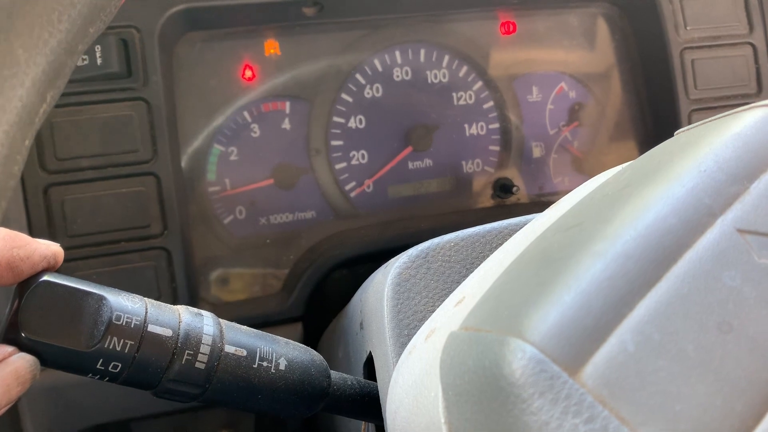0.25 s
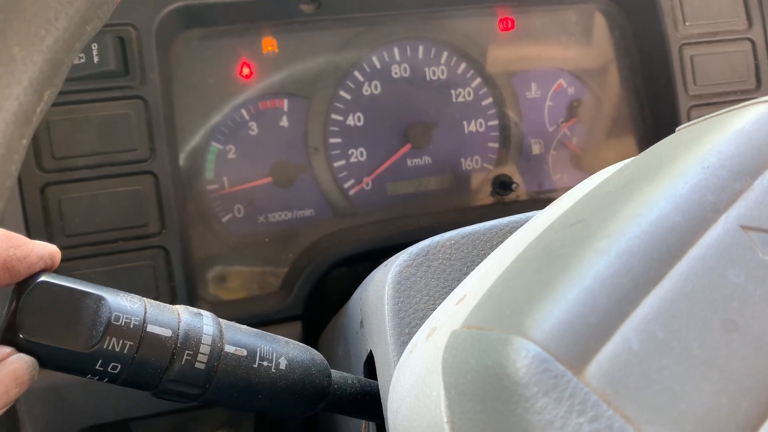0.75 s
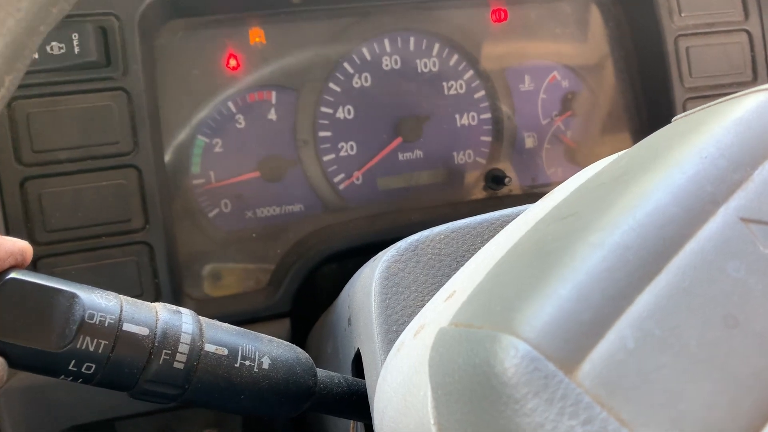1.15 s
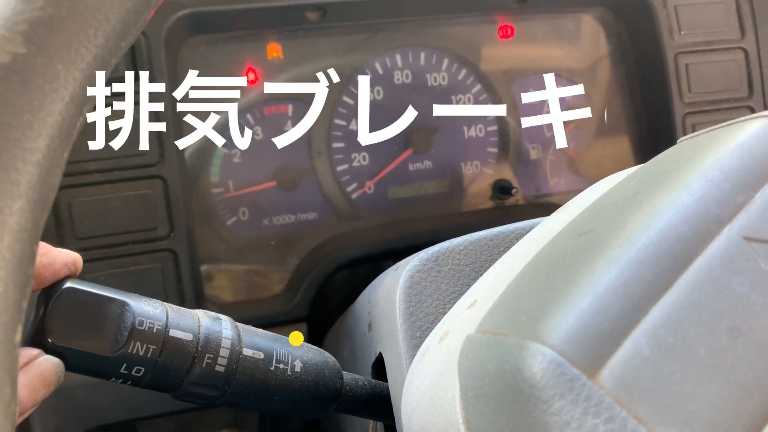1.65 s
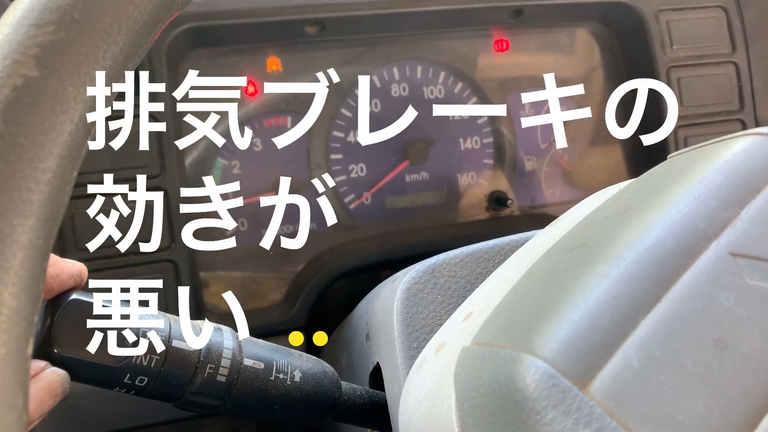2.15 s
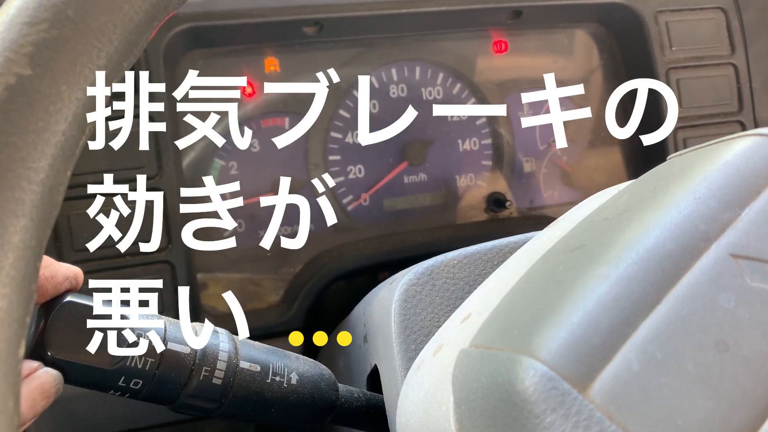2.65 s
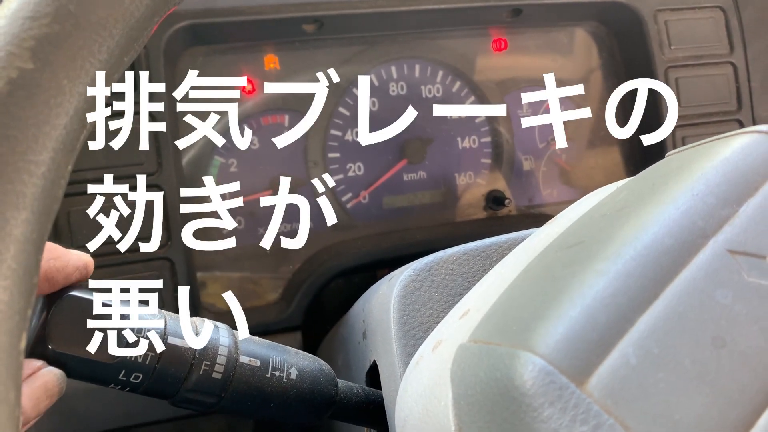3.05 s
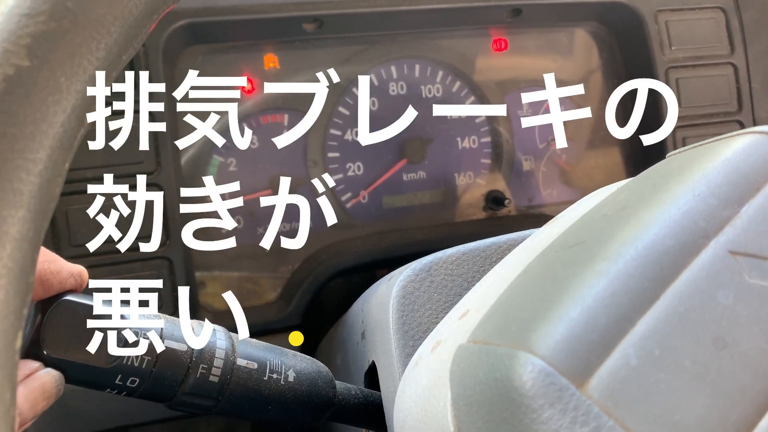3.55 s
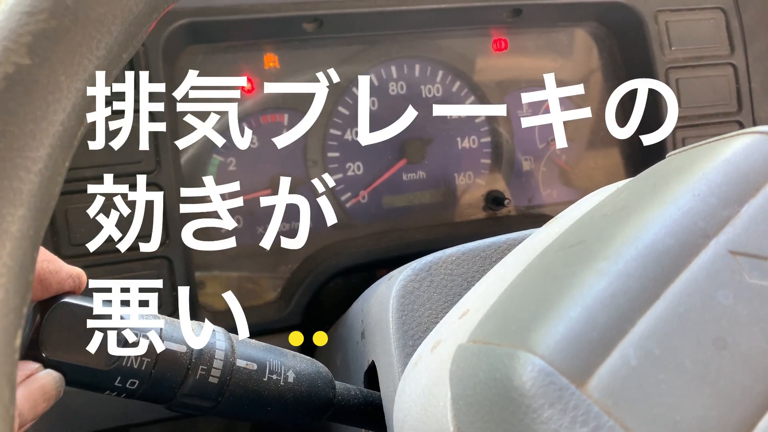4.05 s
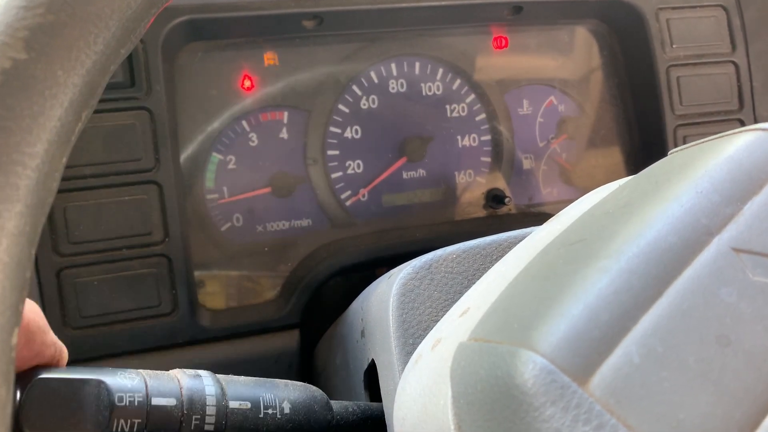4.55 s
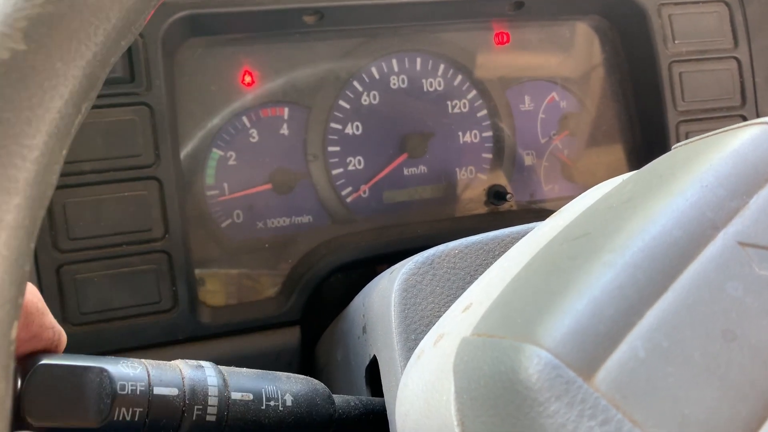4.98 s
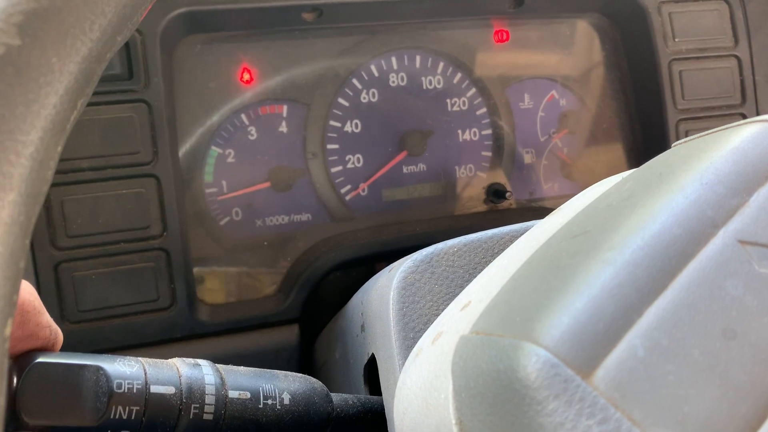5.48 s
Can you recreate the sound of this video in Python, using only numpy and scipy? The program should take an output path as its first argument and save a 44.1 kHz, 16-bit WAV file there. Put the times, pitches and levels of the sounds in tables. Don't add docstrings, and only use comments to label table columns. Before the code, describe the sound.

From 0 to about 4.5 seconds a four-cylinder diesel idles under a parked truck cab with its exhaust brake shut: a loud, steady drone around 55 Hz, pulsing about 27 times a second, with block knock, clattering valves and injectors, buzzing panels, uneven floor rumble, a faint fan and pump whine and a thin, fluttering air hiss. At 3.58 a short dry switch tick sounds. At about 4.55 a valve opens with a tick and a bright, sharp puff of air, which quickly drops to a weaker hiss and bleeds out by about 4.9. The drone falls away from 4.6, the engine slowing to about 24 pulses a second by 5.0, while the cab booms low and wavering, then settles. Very high, faint belt squeaks come at 4.85, 5.16 and 5.38. A softer, slightly lower clattering idle runs to the end at 5.7. Close, dry stereo phone pickup.

```python
import sys
import numpy as np
from scipy import signal
from scipy.fft import rfft, irfft
from scipy.io import wavfile
from scipy.ndimage import uniform_filter1d

SR = 44100
rng = np.random.default_rng(int(sys.argv[2]) if len(sys.argv) > 2 else 0)


def volts_from_decibels(level):
    exponent = np.asarray(level, float) / 20
    return 10 ** exponent


def materialize(psi):
    bounded = np.clip(np.atleast_2d(psi).T, -1, 1)
    quanta = np.round(bounded * 32767).astype(np.int16)
    wavfile.write(sys.argv[1], SR, quanta)


N = 252252
T = np.arange(N) / SR

# (time [s], rate [firings per s])
SPEED = [
    (0, 27.52),
    (4.56, 27.52),
    (4.72, 26.5),
    (4.98, 24.2),
    (5.2, 23.75),
    (5.72, 23.45),
]
# (pitch [Hz], lead [radians])
LEAD = [(28, -.6), (65, .55), (270, 3.1), (390, 5.1), (2300, 4.2), (5300, 9.4), (6250, 12.57), (15800, 0)]
# (pitch [Hz], likeness [0-1], left minus right [dB])
PORTS = [(40, 0.8, -2), (424, 0.93, 0.75), (610, 0.27, 0), (940, 0.35, -5.5), (1500, 0.78, -0.5),
         (2600, 0.18, -1.3), (6240, 0.32, -3.4), (7760, 0.93, 0)]

FIRING_HZ = np.interp(T, *np.transpose(SPEED))
CYCLES = np.cumsum(FIRING_HZ) / SR / 4
VALVE_S = 4.546
OPEN_S = 4.61


def ramp(t, start, length):
    return np.clip((t - start) / length, 0, 1)


def shut(t):
    swing_s = 0.024
    return 1 - ramp(t, OPEN_S, swing_s)


def fuel_db(t):
    warm_db, creep_db_per_s = 0.03, 0.04
    cut_db, cut_tau_s = -12, 0.15
    catch_s, catch_rise_s = 4.95, 0.11
    cut = cut_db * (1 - np.exp(-np.maximum(t - OPEN_S, 0) / cut_tau_s))
    return (warm_db + creep_db_per_s * t + cut) * (1 - ramp(t, catch_s, catch_rise_s))


def read(points, hz, column=1):
    rows = np.transpose(points)
    return np.interp(np.log(hz + 1), np.log(rows[0] + 1), rows[column])


def curve(points, column=1, t=T):
    rows = np.transpose(points)
    return np.interp(t, rows[0], rows[column])


def lift(modes, hz, column=2):
    return sum(m[column] / (1 + (2 * (hz - m[0]) / m[1]) ** 2) for m in modes)


def wander(rate_hz, t=T):
    hz = np.geomspace(rate_hz / 20, rate_hz, 12)[:, None]
    waves = np.sin(2 * np.pi * (hz * T[::256] + rng.random(hz.shape)))
    slow = (waves / np.sqrt(hz)).sum(0)
    return np.interp(t, T[::256], slow / slow.std())


def ports(x):
    half = np.exp(0.5j * curve(LEAD, t=np.fft.rfftfreq(N, 1 / SR)))
    return irfft(rfft(x) * np.array([half, 1 / half]), N)


def noise(braked_db, free_db, patchy_db, size=2048):
    linger_s = 0.055
    hop = size // 4
    frames, hz = N // hop + 5, np.fft.rfftfreq(size, 1 / SR)
    a, b, c, d, patch = rng.standard_normal((frames, len(hz), 5)).T
    patch = uniform_filter1d(uniform_filter1d(patch, size=8, axis=0), size=8, axis=1)

    flap = shut(np.arange(frames) * hop / SR - linger_s)
    db = braked_db(hz)[:, None] * flap + free_db(hz)[:, None] * (1 - flap)
    db = db + patchy_db * patch / patch.std()

    same = np.clip(read(PORTS, hz), 0, 1)[:, None]
    tilt = volts_from_decibels(read(PORTS, hz, column=2) / 2)[:, None]
    lead = np.exp(1j * curve(LEAD, t=hz))[:, None]
    right = a + 1j * b
    left = same * right * lead + np.sqrt(1 - same ** 2) * (c + 1j * d)
    z = np.array([left * tilt, right / tilt]) * volts_from_decibels(db) * np.sqrt(3 * SR / size / 2)
    return signal.istft(z, nperseg=size, noverlap=size - hop)[1][:, :N]


def order(k, braked_db, free_db, lag, waver_db, pan_db=0.44, skew=0):
    t = T[::64]
    db = shut(t) * braked_db + (1 - shut(t)) * free_db + fuel_db(t)
    gain = np.sqrt(2) * np.interp(T, t, volts_from_decibels(db + waver_db * wander(6.0, t=t)))
    side = np.array([[0.5], [-0.5]])
    lead = curve(LEAD, t=k * FIRING_HZ / 4) + skew
    return gain * volts_from_decibels(side * pan_db) * np.cos(2 * np.pi * (k * CYCLES - lag) + side * lead)


def drone():
    # (order [waves per cycle], level braked [dB], level free [dB])
    firing_orders = [(4, -37, -48), (8, -21, -31), (12, -35, -35), (16, -40, -49), (20, -45, -46),
                     (24, -46, -48), (28, -46, -47), (32, -43, -45), (36, -54, -60)]
    # (order [waves per cycle], level braked [dB], level free [dB])
    uneven_db = [(5, -63, -68), (6, -52, -68), (7, -42, -50), (11, -49, -51), (13, -59, -60),
                 (19, -56, -59), (22, -55, -55), (30, -51, -57), (33, -52, -52), (35, -61, -61)]
    # (order [waves per cycle], level braked [dB])
    geared = [
        (6.65, -48),
        (7.33, -48),
        (10.28, -46),
    ]
    scatter_db = 1.5
    timing_below = 12

    firing = sum(order(k, a, b, 0.33 * (k in (4, 12)), 0.35) for k, a, b in firing_orders)

    uneven = 0
    between = [k for k in range(5, 36) if k % 4]
    scatter = scatter_db * rng.standard_normal((len(between), 2))
    for k, (a, b) in zip(between, scatter):
        braked_db = curve(uneven_db, t=k) + a
        free_db = curve(uneven_db, column=2, t=k) + b
        lag = np.where(k < timing_below, 0.17, rng.random())
        uneven = uneven + order(k, braked_db, free_db, lag, 2.0)

    whine = sum(order(k, db, db - 17.5, rng.random(), 3.2) for k, db in geared)
    return firing + uneven + whine


def knock():
    # (pitch [Hz], level [dB])
    outline = [(230, -50.5), (400, -59.5), (900, -68)]
    # (pitch [Hz], width [Hz], lift [dB])
    block = [(264, 32, 2.3), (346, 76, 7.8), (441, 35, 10.7), (570, 172, 8.65), (716, 11, 9.6),
             (874, 70, 10.2)]
    free_knock_db, uneven_firing_db = -5, 2.0
    pan, spread_rad = 1.8, 2.4

    def colour_db(hz):
        return read(outline, hz) + lift(block, hz)

    out = 0
    for n in range(10, 34):
        braked_hz, free_hz = n * FIRING_HZ[[0, -N // 20]]
        lag = 0.5 + 0.21 * rng.standard_normal()
        skew = spread_rad * (1 - read(PORTS, braked_hz)) * rng.standard_normal()
        pan_db = pan * read(PORTS, braked_hz, column=2)
        free_db = colour_db(free_hz) + free_knock_db
        out = out + order(4 * n, colour_db(braked_hz), free_db, lag, 1.5, pan_db, skew)
    strength = rng.standard_normal(200)[(4 * CYCLES).astype(int)]
    return out * volts_from_decibels(uneven_firing_db * uniform_filter1d(strength, size=300))


def clatter():
    # (pitch [Hz], level braked [dB per Hz], level free [dB per Hz])
    clatter_db = [(268, -75, -82), (362, -65, -69), (433, -68.5, -71), (580, -72, -78), (756, -74.5, -77.5),
                  (920, -73.5, -76), (1100, -74.5, -76), (1890, -73.5, -75.5), (2270, -79.5, -80.5),
                  (2830, -80.5, -80.5), (4350, -84.5, -84.5), (6950, -101, -91.5), (12700, -99, -99),
                  (15500, -120, -120)]
    # (pitch [Hz], width [Hz], lift [dB])
    panel_modes = [(369, 21, 0.5), (439, 26, 6), (598, 42, 3), (875, 25, 5), (1015, 20, 1), (1135, 30, 5),
                   (1305, 40, 3), (1570, 45, 7), (1800, 82, 4)]
    waves = uniform_filter1d(rng.standard_normal(1025), size=2)

    def panels(hz):
        return lift(panel_modes, hz) + 1.9 * waves * (hz < 6000)

    def braked_db(hz):
        return read(clatter_db, hz) + panels(hz)

    def free_db(hz):
        return read(clatter_db, hz, column=2) + panels(hz)

    rattle = noise(braked_db, free_db, 1.3)
    firing = 4 * CYCLES + 0.08
    beat_db = 5 * np.exp(-(firing % 1) / 0.15) + 4 * np.exp(-((firing + 0.5) % 1) / 0.15)
    beat_db *= 1 + 0.18 * np.cos(np.pi * firing)
    body = signal.lfilter(*signal.butter(1, 2500, fs=SR), rattle)
    return rattle + body * (volts_from_decibels(beat_db - beat_db.mean()) - 1)


def rumble():
    # (pitch [Hz], level braked [dB per Hz], level free [dB per Hz])
    rumble_db = [(20, -76, -79), (34.8, -66, -64), (50.3, -64, -58), (68, -55, -55), (88, -64, -66),
                 (137, -62, -57.5), (195, -58, -61), (231, -74, -71), (297, -74, -76), (400, -87, -111)]
    return noise(lambda hz: read(rumble_db, hz), lambda hz: read(rumble_db, hz, column=2), 0.64, size=4096)


def air():
    # (pitch [Hz], width [Hz], lift in leak [dB], lift in puff [dB])
    orifice = [(3400, 450, 4, -6), (4720, 430, 7, 7), (7900, 200, 7.5, 12.5)]
    # (pitch [Hz], level [dB per Hz])
    leak_colour = [(1500, -100), (3000, -97.5), (5000, -90), (7000, -88), (8700, -80), (10000, -89),
                   (13000, -86.5), (15800, -86.5)]
    # (pitch [Hz], level [dB per Hz])
    puff_colour = [(1000, -80), (2000, -79), (4500, -77), (6500, -76), (8800, -67), (12000, -78.5),
                   (15800, -86)]
    puff_rise_s, empty_s, bleed_power = 0.028, 0.38, 1.05
    burst_s, burst_db, burst_fall_db_per_s = 0.05, 1.5, -330
    leak_level_db, leak_step_db, leak_rest_db = 0.8, -17, -38
    bleed_db, bleed_rest_db = -5, -37

    def leak_db(hz):
        return read(leak_colour, hz) + lift(orifice, hz)

    def puff_db(hz):
        return read(puff_colour, hz) + lift(orifice, hz, column=3)

    leak = noise(leak_db, leak_db, 0.63, size=512)
    puff = noise(puff_db, puff_db, 1.3, size=512)
    throb = np.cos(2 * np.pi * 2 * CYCLES)
    flutter_db = 0.5 * wander(60.0) + 0.5 * throb

    opened = ramp(T, VALVE_S, puff_rise_s)
    pressure = (1 - ramp(T, VALVE_S, empty_s)) ** bleed_power
    burst = volts_from_decibels(burst_db + burst_fall_db_per_s * np.maximum(T - VALVE_S - burst_s, 0))
    seep = volts_from_decibels(leak_level_db + leak_step_db * opened) * pressure + volts_from_decibels(leak_rest_db)
    blow = opened ** 2 * (burst + volts_from_decibels(bleed_db) * pressure + volts_from_decibels(bleed_rest_db))
    return leak * seep * volts_from_decibels(flutter_db) + puff * blow * volts_from_decibels(1.34 * flutter_db)


def ticks():
    # (time [s], peak level [dB])
    tick_events = [
        (3.5803, -27),
        (4.5615, -25),
    ]
    out, t = np.zeros(N), np.arange(200) / SR
    for s, db in tick_events:
        out[round(s * SR):][:200] += volts_from_decibels(db + 4) * rng.standard_normal(200) * np.exp(-t / 0.00068)
    return ports(signal.lfilter(*signal.butter(2, 5000, "high", fs=SR), out))


def boom():
    # (pitch [Hz], level [dB])
    cab_modes = [(46, -38), (54.5, -32), (70.5, -39), (131, -44)]
    rise_s, settle_s, settle_tau_s, settled_db = 0.06, 5.0, 0.08, -14
    ring = 0
    for hz, db in cab_modes:
        ring = ring + volts_from_decibels(db + 2 * wander(8.0)) * np.cos(2 * np.pi * (hz * T + rng.random()))
    settle_db = settled_db * (1 - np.exp(-np.maximum(T - settle_s, 0) / settle_tau_s))
    shake = ramp(T, OPEN_S, rise_s) * volts_from_decibels(settle_db)
    fade = np.clip((T[-1] - T) / 0.05, 0, 1)
    return ports(np.sqrt(2) * ring * shake * fade)


def squeaks():
    # (time [s], length [s], level [dB], pitch [Hz])
    chirps = [
        (4.845, .02, -51, 13200),
        (4.855, .09, -58, 12900),
        (4.86, .08, -71, 12000),
        (5.16, .1, -55, 12900),
        (5.38, .07, -66, 12900),
    ]
    out = np.zeros(N)
    for s, length, db, hz in chirps:
        t = np.arange(round(length * SR)) / SR
        jitter = uniform_filter1d(rng.standard_normal((2, 9000)), size=120)[:, :len(t)] * np.sqrt(120)
        chirp = (1 + 0.5 * jitter[0]) * np.sin(2 * np.pi * hz * t + 0.83 * jitter[1])
        out[round(s * SR):][:len(t)] += volts_from_decibels(db) * chirp * signal.windows.tukey(len(t), 0.4)
    return ports(out)


def scene():
    engine = drone() + knock() + clatter() + rumble()
    return engine + air() + ticks() + boom() + squeaks()


def low_pass(x):
    return signal.sosfilt(signal.butter(12, 17040, fs=SR, output="sos"), x)


def record(dry):
    edge = signal.firwin(1023, 15750, window=("kaiser", 9), fs=SR)
    mix = signal.oaconvolve(dry, edge[None], "same", axes=1)
    return low_pass(mix)


dry = scene()
out = record(dry)
materialize(out)
```